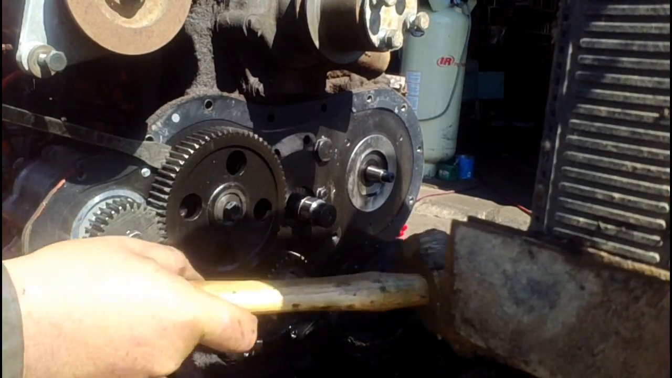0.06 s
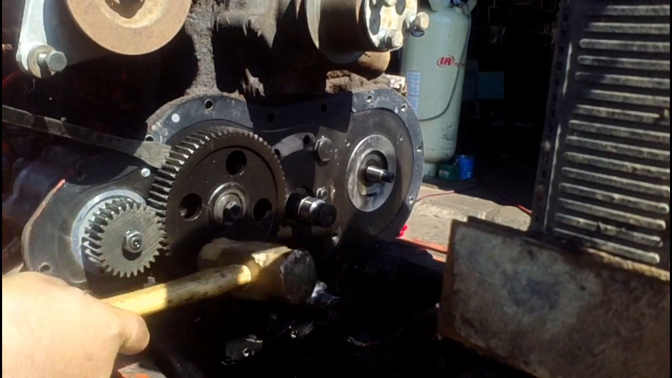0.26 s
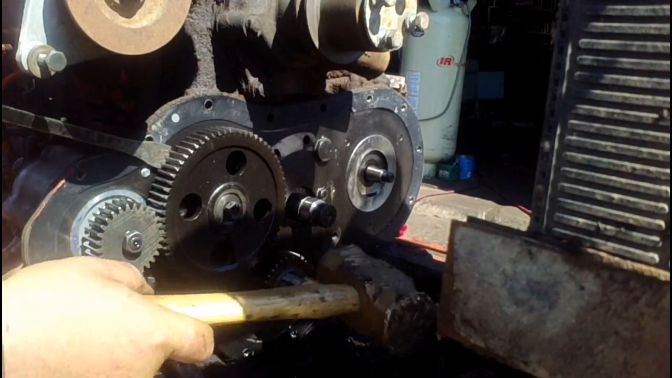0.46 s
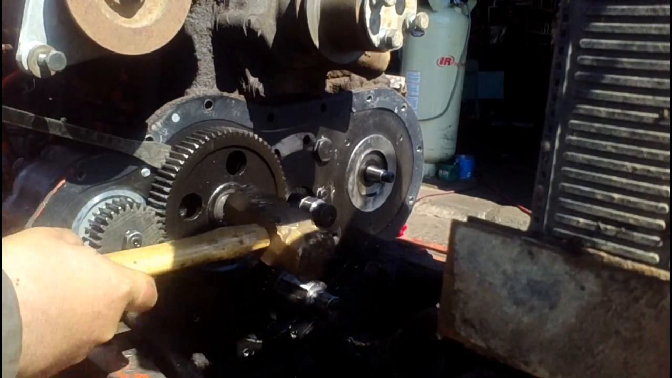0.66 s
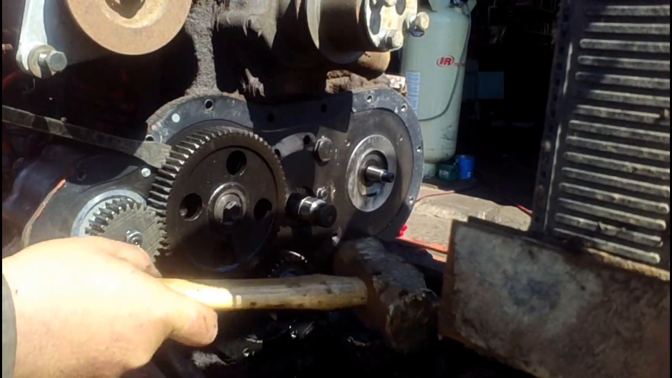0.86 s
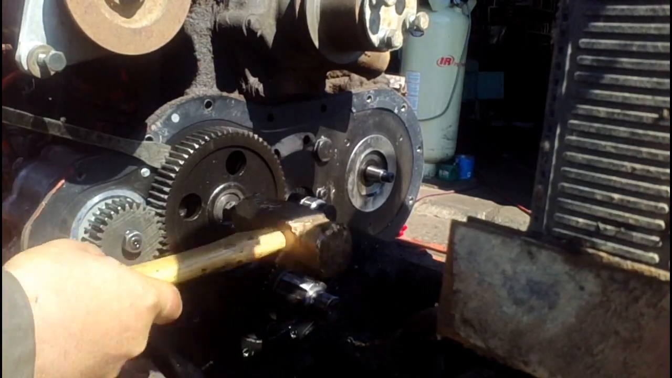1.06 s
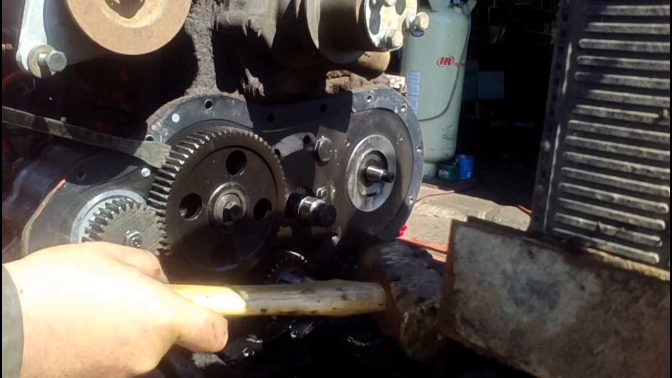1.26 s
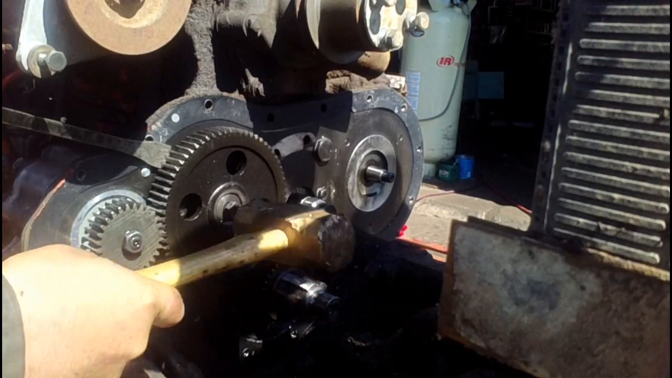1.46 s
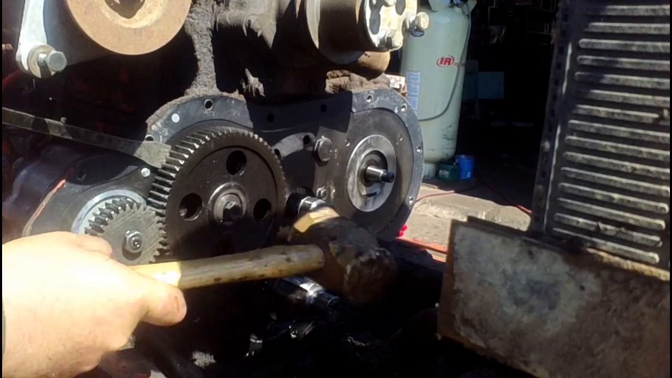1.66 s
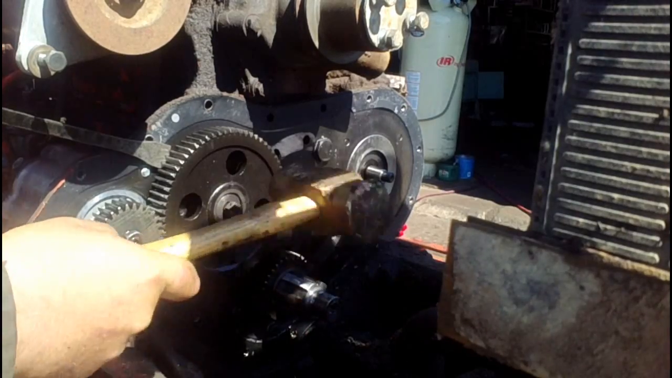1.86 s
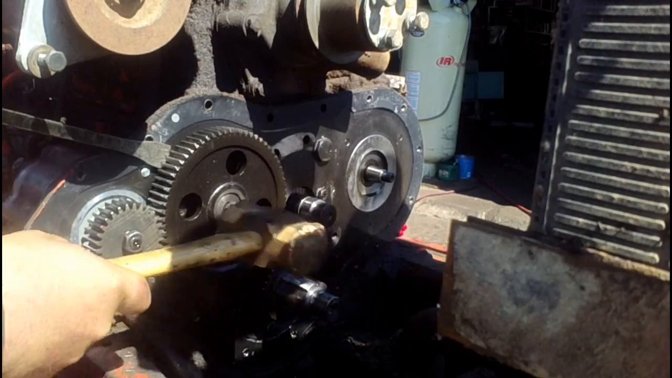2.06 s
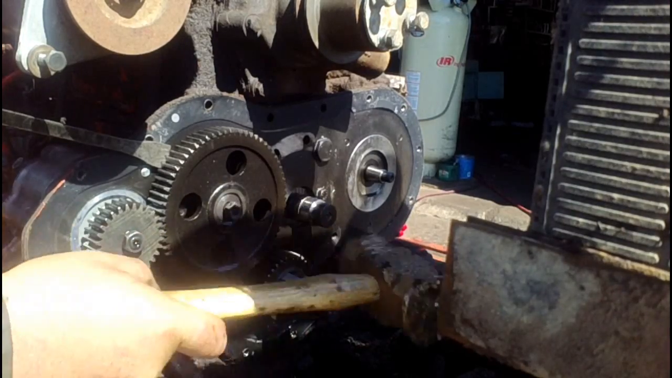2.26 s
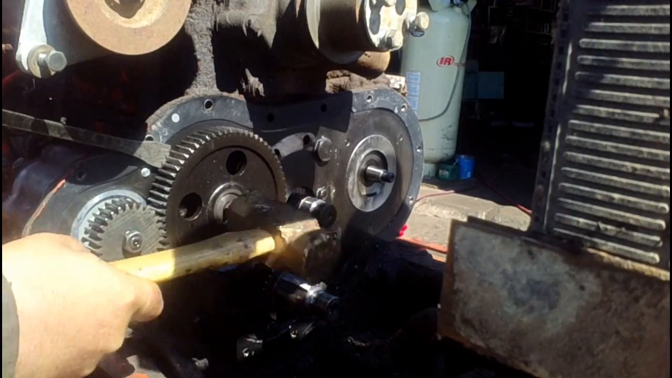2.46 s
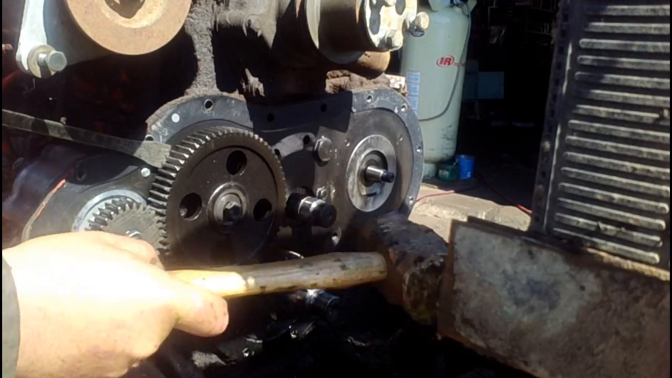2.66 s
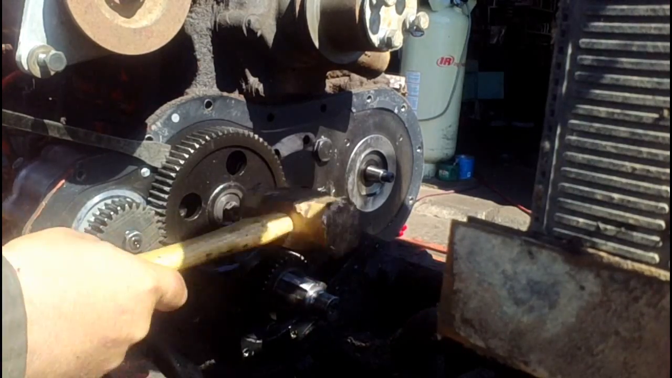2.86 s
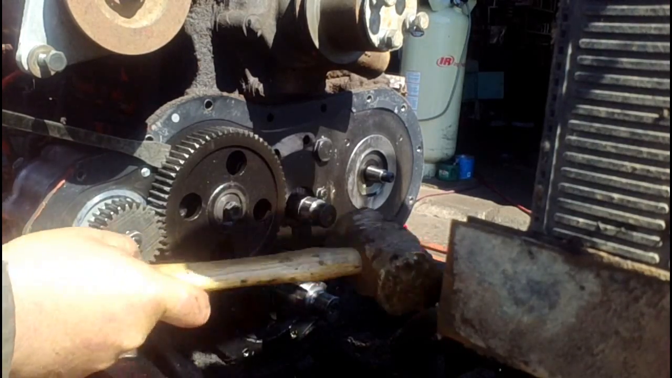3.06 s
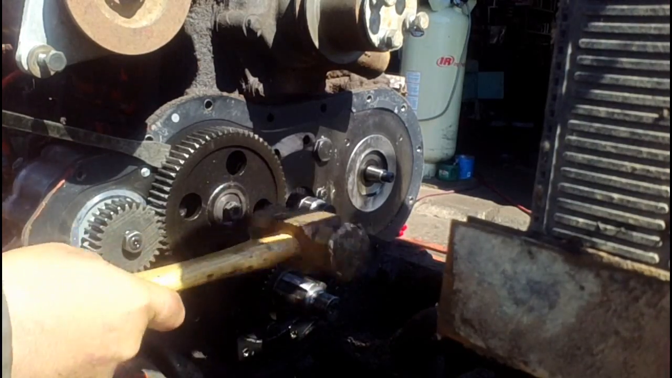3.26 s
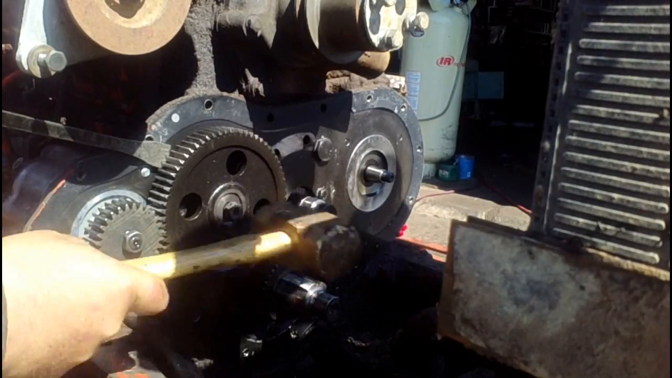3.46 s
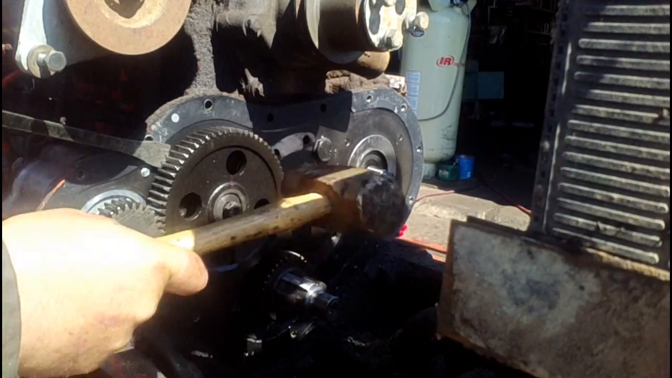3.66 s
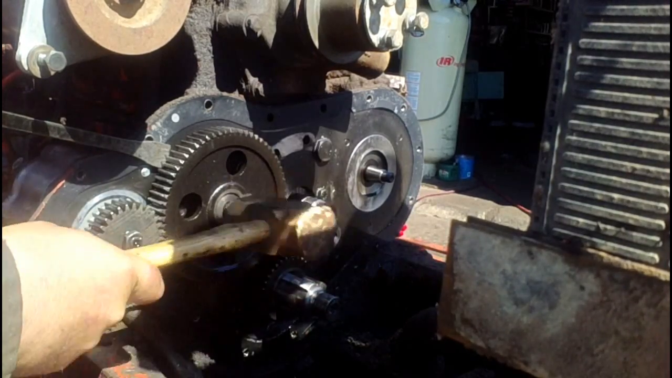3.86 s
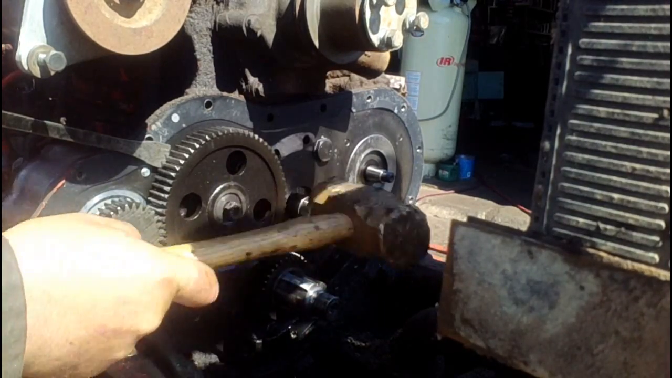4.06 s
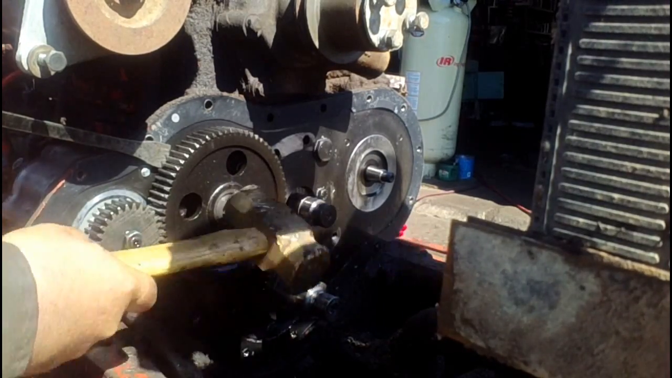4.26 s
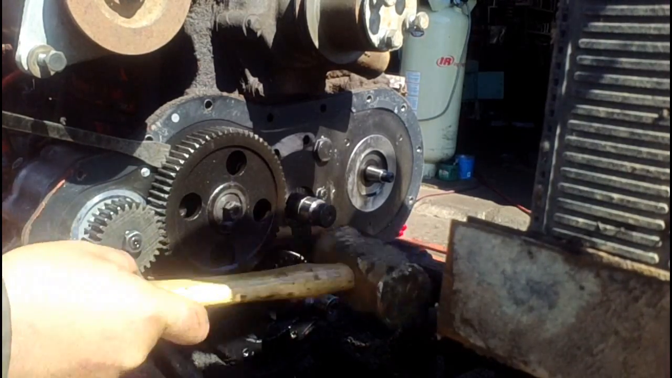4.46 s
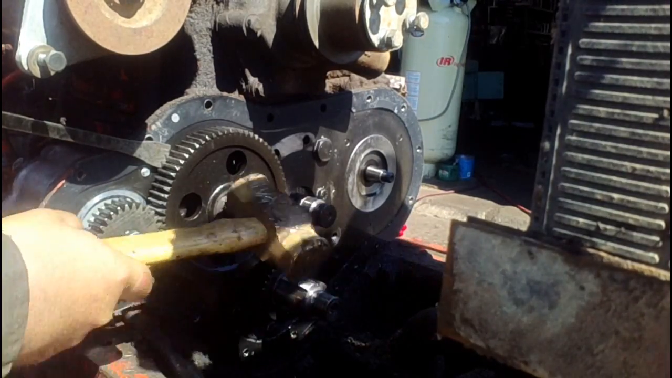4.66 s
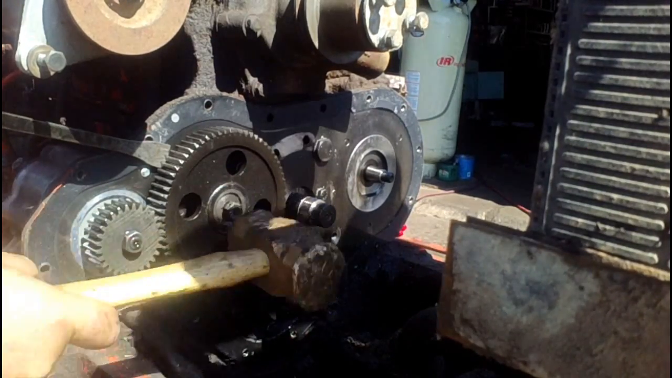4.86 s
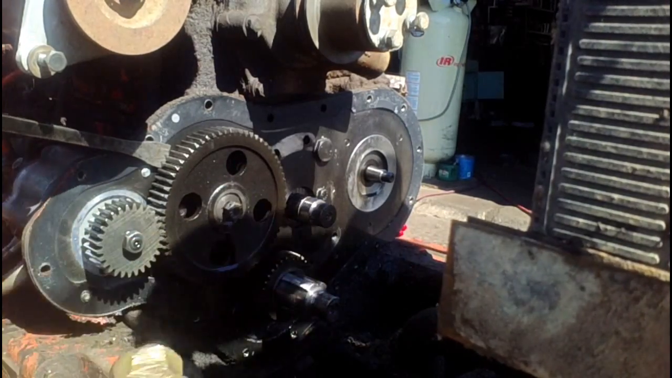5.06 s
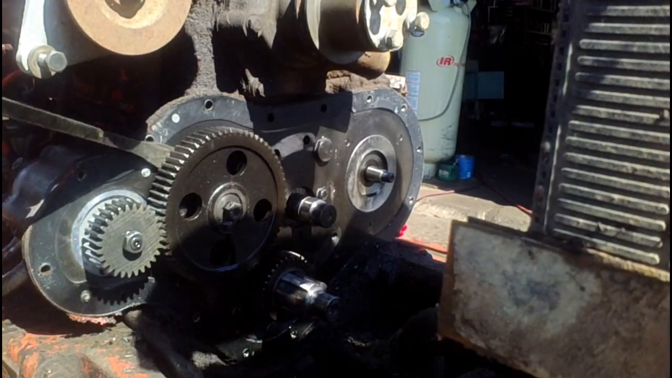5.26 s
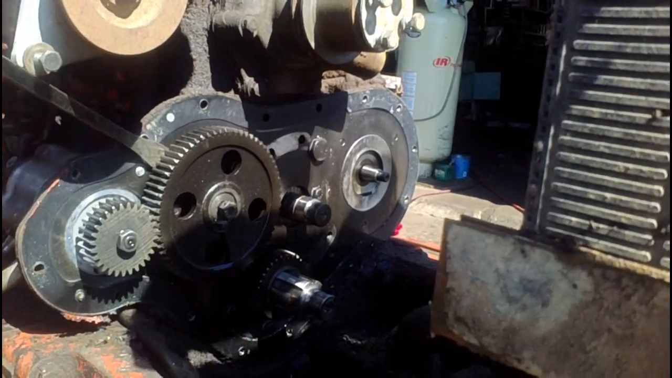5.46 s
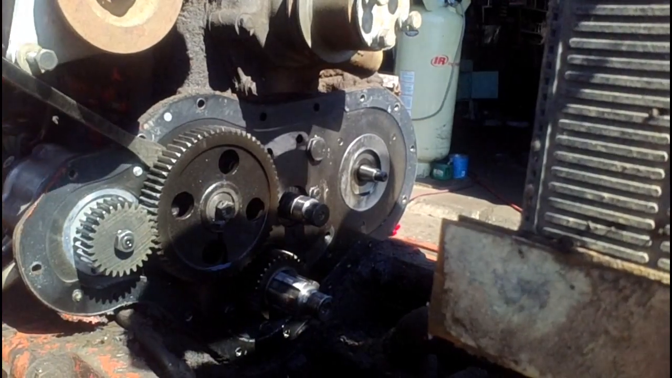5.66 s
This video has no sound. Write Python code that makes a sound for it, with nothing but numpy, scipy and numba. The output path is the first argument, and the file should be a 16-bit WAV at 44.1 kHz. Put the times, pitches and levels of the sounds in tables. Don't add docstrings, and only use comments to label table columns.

```python
import sys
import numpy as np
from scipy import signal
from scipy.fft import rfft, irfft
from scipy.io import wavfile
from numba import njit

SR = 44100
rng = np.random.default_rng(int(sys.argv[2]) if len(sys.argv) > 2 else 0)


def output_pcm(signal):
    pcm = np.clip(np.atleast_2d(signal).T, -1, 1) * 32767
    wavfile.write(sys.argv[1], SR, np.round(pcm).astype(np.int16))


def gain_from_db(level_db):
    decades = np.asarray(level_db, float) / 20
    return 10 ** decades


N = 251811


@njit
def ring(at, hz, t60, gain):
    out = np.zeros(N)
    for m in range(len(hz)):
        turn_and_fade = np.exp(2j * np.pi * hz[m] / SR - np.log(1000) / (t60[m] * SR))
        for k in range(len(at)):
            z = gain[k, m]
            for i in range(at[k], min(N, at[k] + int(1.3 * t60[m] * SR))):
                out[i] += z.imag
                z *= turn_and_fade
    return out


def strike(s, hz, t60, db, scatter_db, turns):
    chance = rng.standard_normal((len(s), 2, len(hz)))
    size = gain_from_db(db + scatter_db * chance[:, 0])
    phase = np.exp(2j * np.pi * turns * chance[:, 1])
    at = (np.asarray(s) * SR).astype(np.int64)
    return ring(at, 1. * hz, np.maximum(t60, 1e-3), size * phase)


def band(x, low_hz, high_hz):
    return signal.sosfilt(signal.butter(2, [low_hz, high_hz], "band", fs=SR, output="sos"), x)


def unit(x):
    return x / np.sqrt(np.mean(x ** 2))


def swell(start, length, db, rise_db_s, fall_db_s):
    t = np.arange(N) / SR - start
    return gain_from_db(db + rise_db_s * np.minimum(t, 0) - fall_db_s * np.maximum(t - length, 0))


def since_blow():
    s, t = np.array(BLOWS)[:, 0], np.arange(N) / SR
    last = np.maximum(np.searchsorted(s, t) - 1, 0)
    return np.maximum(t - s[last], 0)


# t/s, blow level/dB, bending ring level/dB, its partner's level/dB, upper ring level/dB
BLOWS = [(0.1276, -5, 17.5, -15, 14.5), (0.5981, 7.5, -1, 2.5, 1.5), (0.9451, 5.5, 2.5, 5.5, 7),
         (1.3028, 6, 4.5, -3, 3.5), (1.6534, 9, 2, -5, 4), (2.0218, 9, 0, -4, 3.5),
         (2.3701, 6.5, 2.5, -4, 1), (2.721, 8, 0.5, 0, -0.5), (3.0724, 10, 2.5, -10.5, 0.5),
         (3.4351, 8, 1.5, 3.5, 0.5), (3.822, 7, 1.5, -1.5, -4), (4.2078, 6.5, 0, -0.5, 1.5),
         (4.5908, 10.5, 1.5, -0.5, -0.5)]
# f/Hz, level/dB, t60/s
BOLT_RINGS = [(1700, 3, 0.021), (1886, -7.5, 0.036), (2164, -1, 0.012), (2354, -3.5, 0.015),
              (604, -13, 0.034), (833, -7, 0.016), (1059, -10, 0.026), (1213, -10.5, 0.03),
              (1479, -4.5, 0.015), (2520, -18.5, 0.043), (3137, -11, 0.021), (2064, -11, 0.024),
              (2760, -7.5, 0.017), (3362, -17.5, 0.017),
              (4444, -12.5, 0.018), (6120, -26.5, 0.038), (6343, -7, 0.0068), (8940, -22, 0.016),
              (9720, -20.5, 0.025), (12200, -22, 0.023)]


def bolt():
    clank_db = 5.5
    contact_s, bend_build_s = 0.0002, 0.0026
    s, blow_db, bend_db, partner_db, upper_db = np.transpose(BLOWS)
    hz, mode_db, t60 = np.transpose(BOLT_RINGS)
    mode = np.arange(len(hz))
    landing_db = np.outer(bend_db, mode == 0) + np.outer(partner_db, mode == 1)
    landing_db += np.outer(upper_db, (mode > 1) & (mode < 4))
    db = clank_db + blow_db[:, None] + mode_db + landing_db
    age = since_blow()
    clank = np.zeros(N)
    for some, build_s in ((hz > 2000, contact_s), (hz <= 2000, bend_build_s)):
        rings = strike(s, hz[some], t60[some], db[:, some], scatter_db=2.0, turns=0.073)
        clank += rings * (1 - np.exp(-age / build_s))
    return clank


# f/Hz, level/dB, t60/s
BLOCK_RINGS = [(136, -13.5, 0.93), (174, -8.5, 0.86), (203.2, -5, 0.92), (235, -15, 2.9), (255.7, -4, 1.1),
               (272.4, -6, 1), (317.4, -1, 1.02), (350.2, -5, 1.93), (372, -7, 0.95), (444.6, -9.5, 1.24),
               (530, -28, 0.32), (824, -7, 0.25), (928, -7, 0.65), (1160, -2.5, 0.55),
               (306.5, -10, 0.94), (340, -19, 0.66), (1486, 4, 0.34), (1520, -33, 0.32), (1650, -14, .25),
               (614, -7, 0.99), (872, 5.5, 0.14), (964, -11, 0.98), (1050, -21, 1), (1142, -8, 0.97),
               (1440, -3, 0.2), (1810, -11, 0.35)]
# f/Hz, level of each mode/dB, t60/s
THICKET = [(120, -38.5, 0.94), (300, -30.5, 0.88), (617, -37, 0.31), (1230, -40, 0.41), (2060, -29, 0.18),
           (3180, -39.5, 0.27), (4720, -47, 0.19), (9900, -50, 0.17), (16200, -60, 0.13)]


def block(s, db, count=900):
    clear_db = -27
    hz, mode_db, t60 = np.transpose(BLOCK_RINGS)
    clear = strike(s[1:], hz, t60, clear_db + db[1:, None] + mode_db, scatter_db=-2.0, turns=0.18)

    at_hz, at_db, at_t60 = np.transpose(THICKET)
    place = (np.arange(count) + rng.random(count)) / count
    hz = at_hz[0] * (at_hz[-1] / at_hz[0]) ** place ** .36
    t60 = np.interp(np.log(hz), np.log(at_hz), at_t60) * gain_from_db(1.5 * rng.standard_normal(count))
    mode_db = np.interp(np.log(hz), np.log(at_hz), at_db) + 3 * np.tanh(rng.standard_normal(count))
    return clear + strike(s, hz, t60, db[:, None] + mode_db, scatter_db=2, turns=1)


# f/Hz, level/dB, t60/s
GLANCE_RINGS = [(224, -14.5, 0.053), (262, -27, 0.31), (206.4, -27.5, 0.31), (490, -22, 0.059),
                (677, -10, 0.024), (1027, -13, 0.06), (1060, -25.5, 0.73), (1232, -18, 0.087),
                (1496, -8, 0.058), (1570, -62, 0.29), (1950, -23, 0.07), (2750, -19.5, 0.022)]


def glance():
    glance_db, choke_s = 4, 0.0054
    hz, db, t60 = np.transpose(GLANCE_RINGS)
    choke = np.clip((BLOWS[0][0] - np.arange(N) / SR) / choke_s + 1, .12, 1)
    return choke * strike([0], hz, t60, glance_db + db, scatter_db=0, turns=1)


# t/s, peak level/dB, f/Hz, bright ring level/dB
KNOCKS = [(0.499, -32.5, 2600, -25), (.506, -23, 1700, -30), (1.547, -23.5, 1990, -33),
          (5.3375, -6, 2400, -10), (5.3555, -27, 3040, 7), (5.3641, -12.5, 3000, -1.5),
          (5.3677, -18, 2400, -30), (5.3882, -21, 2070, -30), (5.3809, -17, 2070, -31),
          (5.4, -27, 2040, -4), (5.4216, -13, 3260, -17), (5.4305, 0, 1950, -5), (5.4338, -6, 1700, -31),
          (5.449, -14, 1670, -32), (5.4524, -7, 2000, -14.5), (5.47, -29, 2050, -28),
          (5.4765, -12.5, 1600, -7), (5.4838, -21, 3110, -11), (5.4955, -10, 2420, -13),
          (5.4987, -10, 2040, -14), (5.5078, -18, 2140, -13), (5.5171, -7.5, 1900, -16),
          (5.5258, -10, 1880, -37), (5.545, -15.5, 1390, -24), (5.7034, -30, 3000, -8.5)]
# f/Hz, level/dB, t60/s
LAID_RINGS = [(1880, -46, 1), (2060, -47, 0.27), (1960, -50, 0.9)]


def clatter():
    rise_s, full_t60_s, linger = 0.00021, 0.015, 0.14
    thud_db = -10
    out, t = np.zeros(N + 4096), np.arange(4096) / SR
    for s, db, hz, bright_db in KNOCKS:
        t60 = full_t60_s * gain_from_db(-linger * db)
        noise = rng.standard_normal((4, len(t)))
        body = gain_from_db(6) * band(noise[0], hz * 0.66, hz * 1.28)
        steel = gain_from_db(8.5) * band(noise[1], 4530, 6180) + gain_from_db(-9.5) * band(noise[2], 7000, 12200)
        thud = gain_from_db(thud_db) * unit(band(noise[3], 250, 900))
        shape = (1 - np.exp(-t / rise_s)) * np.exp(-np.log(1000) * t / t60)
        out[int(s * SR):][:len(t)] += gain_from_db(db) * shape * (body + gain_from_db(bright_db) * steel + thud)

    hardest = max(KNOCKS, key=lambda knock: knock[1])
    hz, db, t60 = np.transpose(LAID_RINGS)
    return out[:N] + strike([hardest[0]], hz, t60, db, scatter_db=0, turns=0)


# t/s, peak level/dB, f/Hz, t60/s
SOFT_RINGS = [
    (.289, -39, 1700, .02),
    (0.4141, -21.5, 1700, 0.022),
    (0.54, -24, 1700, 0.035),
    (5.3796, -20, 2060, 0.053),
    (5.5168, -24, 2060, .02),
]
# pitch ratio, level/dB
SOFT_PARTIALS = [(1, 4), (.88, -6), (0.86, -14)]


def soft_rings():
    ratio, mode_db = np.transpose(SOFT_PARTIALS)
    out = np.zeros(N)
    for s, db, hz, t60 in SOFT_RINGS:
        soft_ring = strike([s], hz * ratio, t60 + 0 * ratio, db + mode_db, scatter_db=2.5, turns=.1)
        out += band(soft_ring, hz * 0.8, hz * 1.24)
    return out


# delay t/s, level/dB, smear/s
ECHOES = [
    (0.0348, -30, 0.0013),
    (0.056, -42, 0.0011),
    (0.161, -43.5, 0.00081),
    (0.2867, -41, 0.00036),
]


def walls(clank):
    answer = np.zeros(int(.5 * SR))
    t = np.arange(1024) / SR
    for delay, wall_db, smear in ECHOES:
        face = unit((1 + rng.standard_normal(len(t))) * np.exp(-t / smear)) / np.sqrt(len(t))
        answer[int(delay * SR):][:len(t)] += gain_from_db(wall_db) * face
    return band(signal.fftconvolve(clank, answer)[:N], 1550, 2240)


# f/Hz, width/Hz, level/dB
FRAME = [(230, 88, -4), (342, 130, 4), (643, 236, 1), (800, 91, -24)]
# start t/s, length/s, level/dB
DRAGS = [
    (5.327, .008, -39.5),
    (5.368, 0.0068, -26),
    (5.43, .1, -24),
]
# t/s, peak level/dB, f/Hz, t60/s
BUMPS = [
    (4.894, -19.5, 120, 0.06),
    (4.922, -17.5, 93, 0.089),
    (5.307, -19.5, 59, 0.08),
    (5.456, -9, 270, 0.043),
    (5.477, -11, 110, 0.036),
    (5.501, -22, 250, 0.034),
    (5.518, -12, 300, 0.054),
    (5.589, -37, 380, .03),
    (5.618, -33, 380, 0.031),
    (5.649, -31, 368, 0.046),
]


def handling():
    noise = rng.standard_normal(N)
    rumble = unit(sum(gain_from_db(db) * unit(band(noise, hz - width / 2, hz + width / 2)) for hz, width, db in FRAME))
    drag = rumble * sum(swell(*row, rise_db_s=2500, fall_db_s=698) for row in DRAGS)
    bumps = np.zeros(N)
    for s, db, hz, t60 in BUMPS:
        bumps += strike([s], np.array([hz]), np.array([t60]), db, scatter_db=0, turns=0)
    return drag + band(bumps, 30, 680)


# f/Hz, level per Hz/dB
YARD = [(59, -24.5), (100, -3), (147, -4.5), (415, -4.5), (836, -13), (1360, -13), (1800, -13.5),
        (3940, -23), (4770, -27), (11900, -35), (16000, -46)]
# t/s, level/dB
YARD_SWELL = [(0, -4), (.55, -4), (.7, 0), (5.71, 0)]
# t of the top/s, level/dB
GUSTS = [
    (.12, -65),
    (.79, -40.5),
    (1.599, -42.5),
    (2.24, -44.5),
    (2.799, -47),
    (3.33, -56),
    (4.652, -65),
    (5.46, -34),
]


def air():
    yard_db, breeze_db = -43, -58.5
    f = np.fft.rfftfreq(N, 1 / SR)
    hz, db = np.transpose(YARD)
    colour = gain_from_db(np.interp(np.log(f + 1), np.log(hz), db))
    yard = unit(irfft(rfft(rng.standard_normal(N)) * colour, N))
    swell_db = np.interp(np.arange(N) / SR, *np.transpose(YARD_SWELL))

    wind = unit(band(band(rng.standard_normal(N), 20, 93), 22, 200))
    gusts = sum(swell(s, 0, db, rise_db_s=91, fall_db_s=125) for s, db in GUSTS)
    return gain_from_db(yard_db + swell_db) * yard + (gain_from_db(breeze_db) + gusts) * wind


def scene():
    glance_db, into_block_db = -15.5, -1.5
    bend_loss = .4
    s, _, bend_db, *_ = np.transpose(BLOWS)
    engine = block(np.r_[0, s], np.r_[glance_db, into_block_db - bend_loss * bend_db])
    clank = bolt()
    return (clank + engine + glance() + clatter() + soft_rings() + walls(clank) + handling() + air())[None]


# f/Hz, width/Hz, depth (0-1)
PORTS = [(4036, 770, 1), (7850, 1250, 1)]


def sound_ports(dry):
    f = np.fft.rfftfreq(N, 1 / SR)
    gain = 1
    for hz, width, depth in PORTS:
        gain = gain * (1 - depth / (1 + 1j * (f ** 2 - hz ** 2) / ((f + 1) * width)))
    return irfft(rfft(dry) * gain, N)


def roll_off(x):
    return signal.sosfilt(signal.butter(12, 16370, fs=SR, output="sos"), x)


def record(dry):
    overloaded = np.clip(sound_ports(dry), -1, 1)
    mix = band(.97 * overloaded, 35, 16500)
    return roll_off(mix)


dry = scene()
out = record(dry)
output_pcm(out)
```